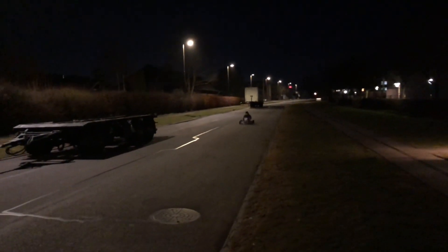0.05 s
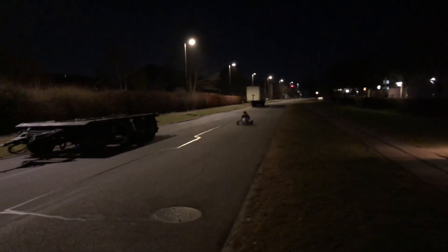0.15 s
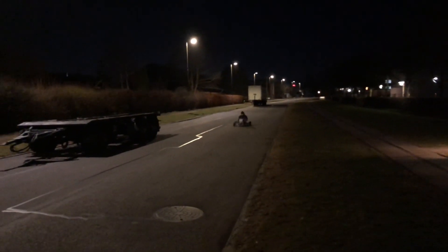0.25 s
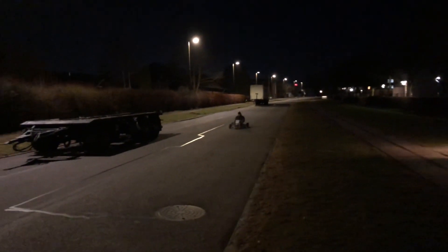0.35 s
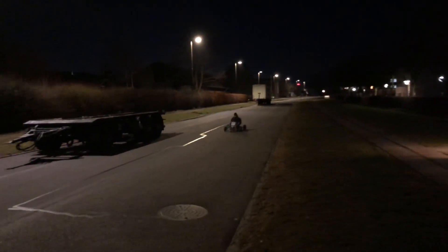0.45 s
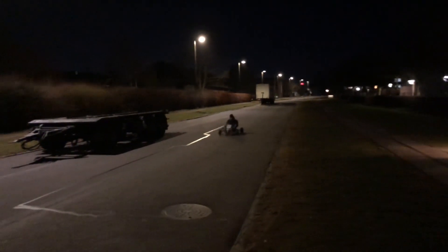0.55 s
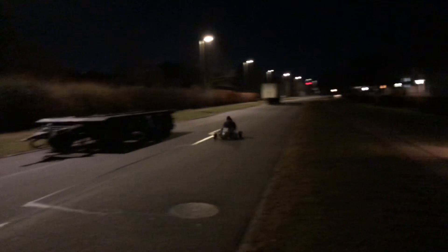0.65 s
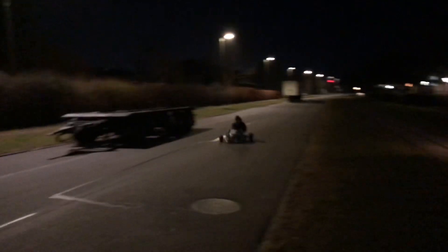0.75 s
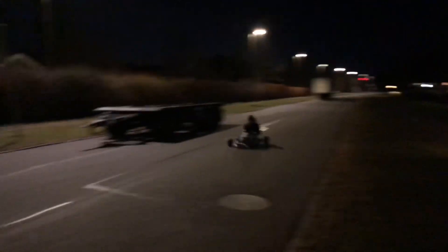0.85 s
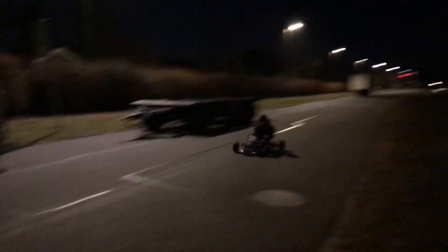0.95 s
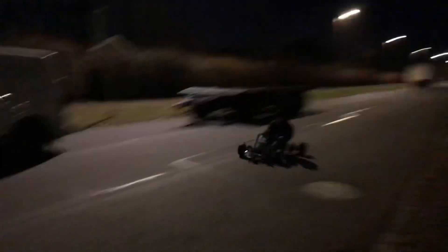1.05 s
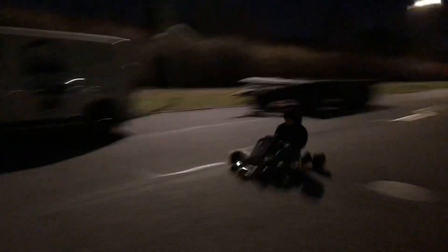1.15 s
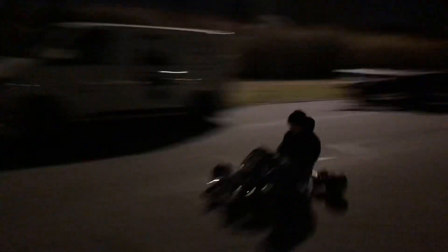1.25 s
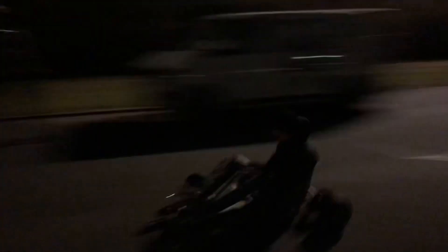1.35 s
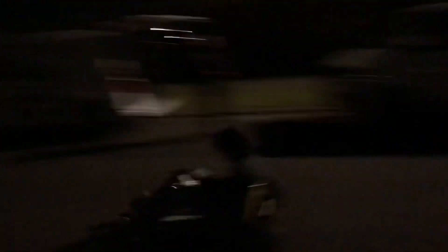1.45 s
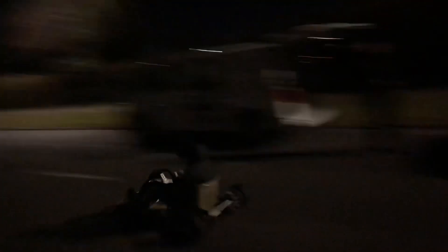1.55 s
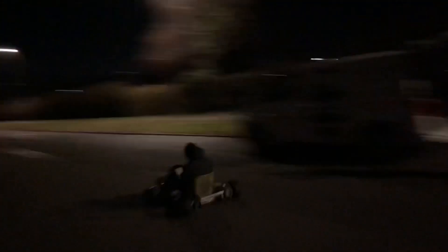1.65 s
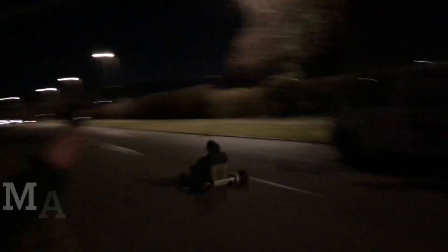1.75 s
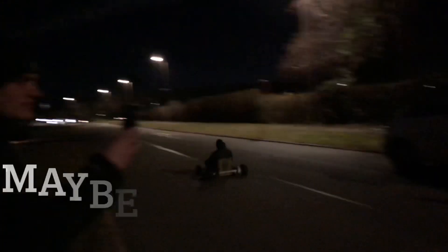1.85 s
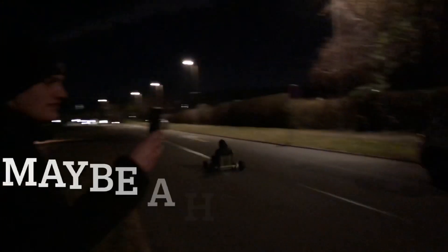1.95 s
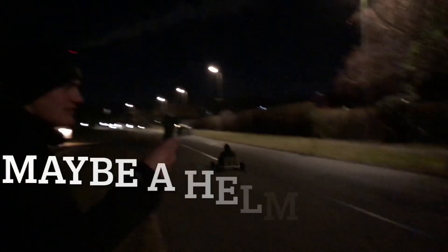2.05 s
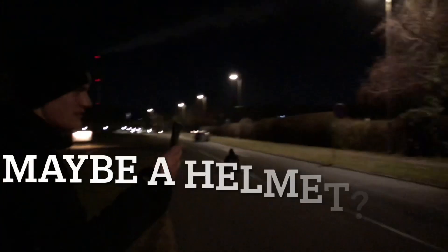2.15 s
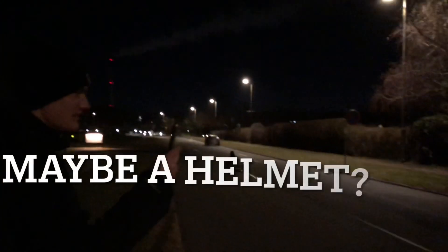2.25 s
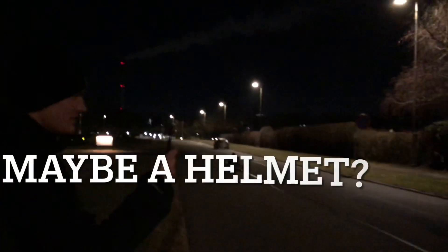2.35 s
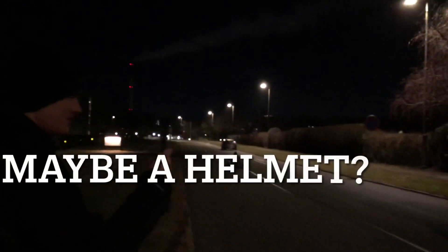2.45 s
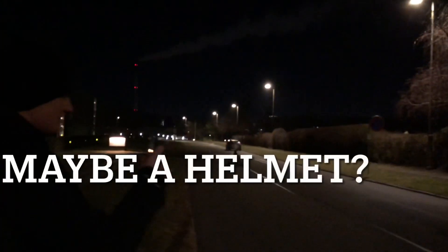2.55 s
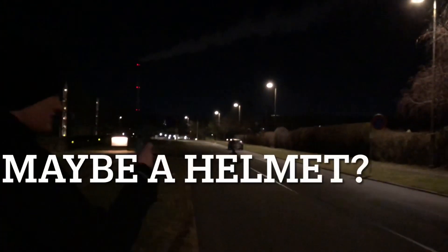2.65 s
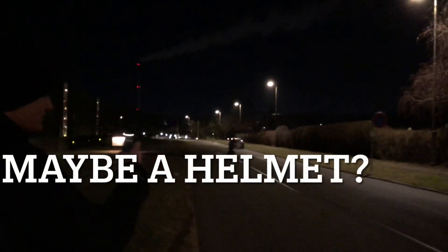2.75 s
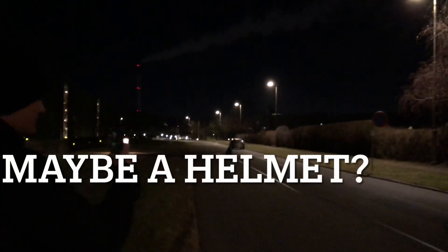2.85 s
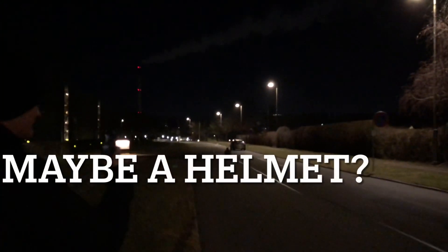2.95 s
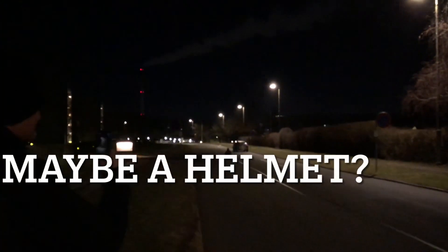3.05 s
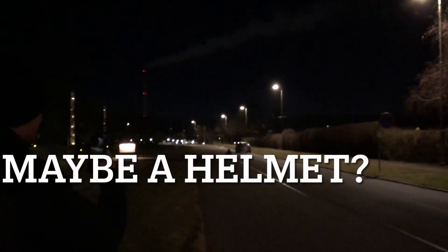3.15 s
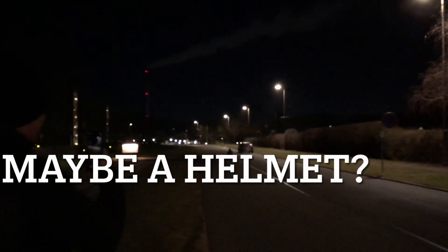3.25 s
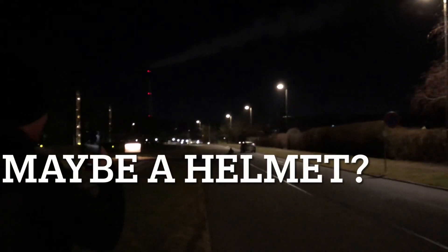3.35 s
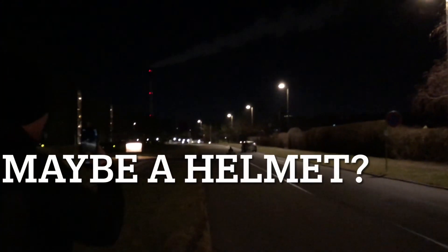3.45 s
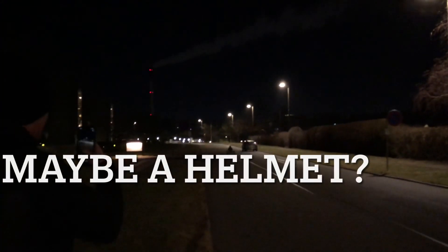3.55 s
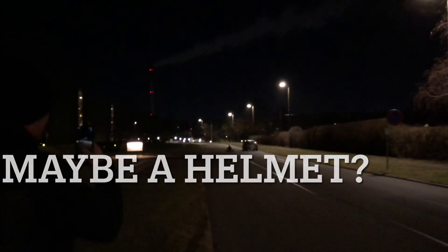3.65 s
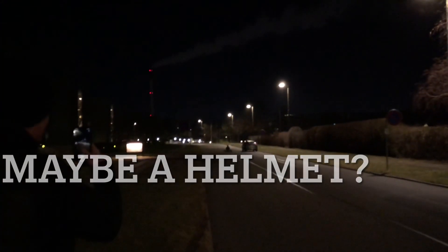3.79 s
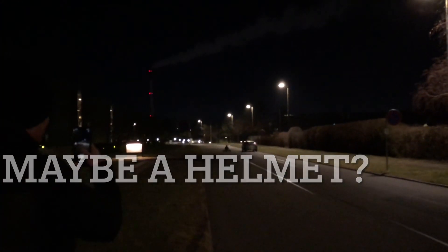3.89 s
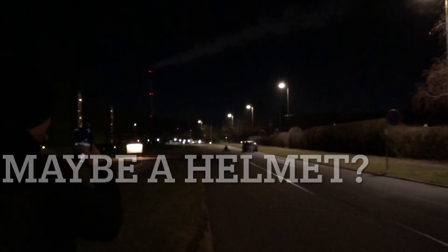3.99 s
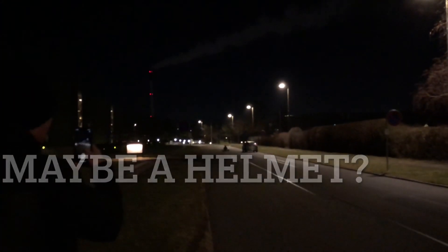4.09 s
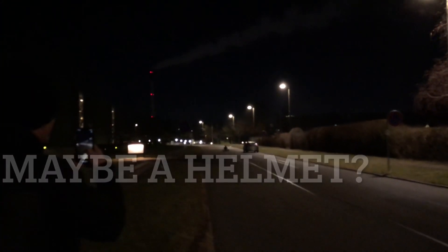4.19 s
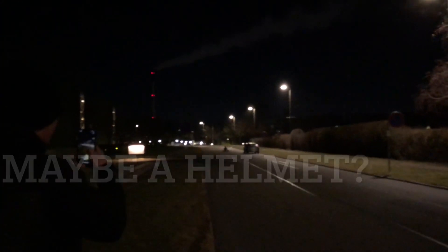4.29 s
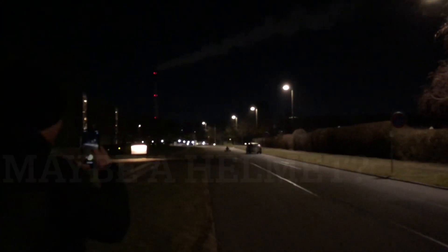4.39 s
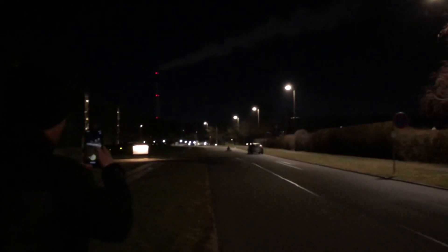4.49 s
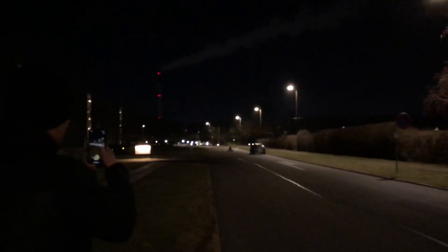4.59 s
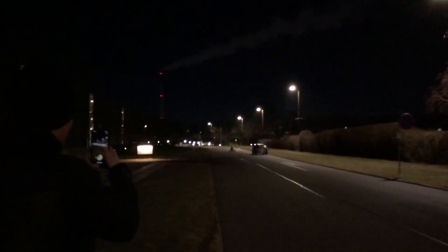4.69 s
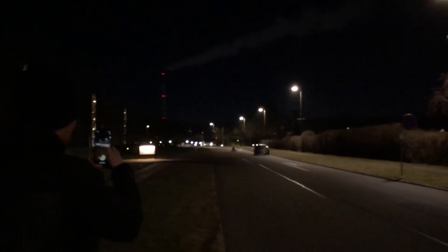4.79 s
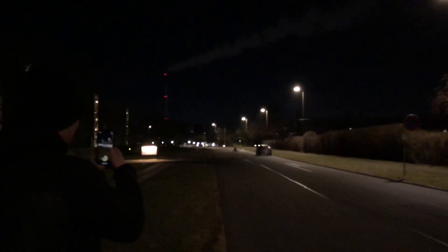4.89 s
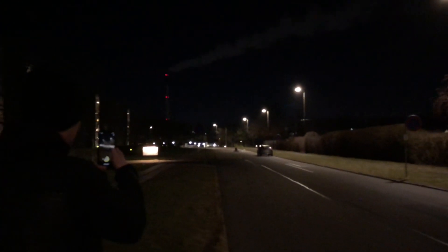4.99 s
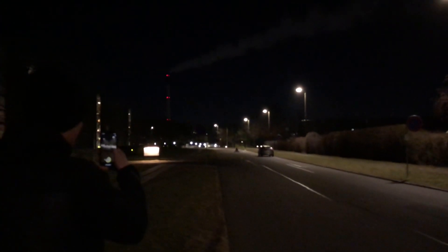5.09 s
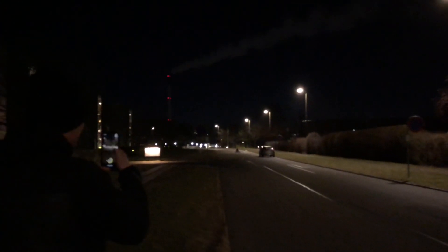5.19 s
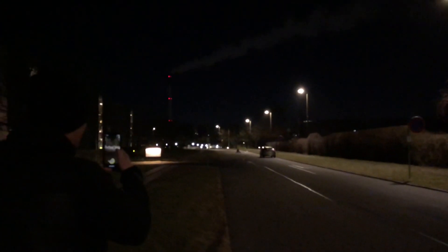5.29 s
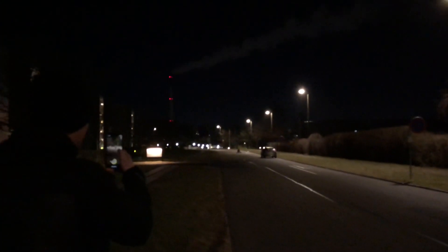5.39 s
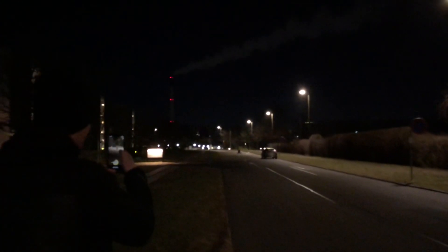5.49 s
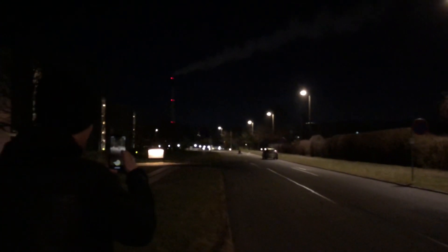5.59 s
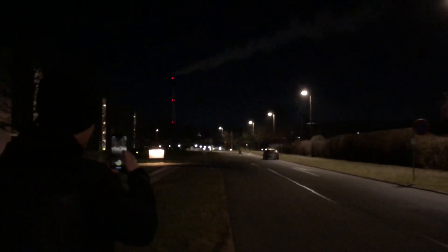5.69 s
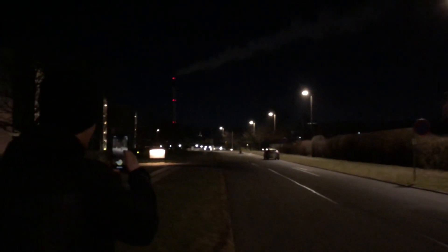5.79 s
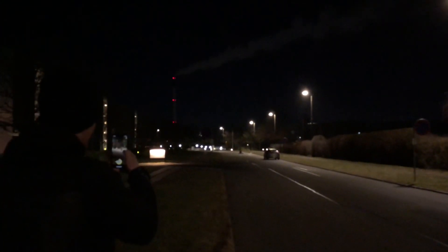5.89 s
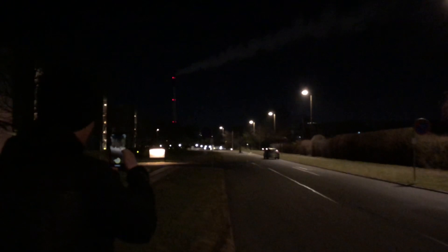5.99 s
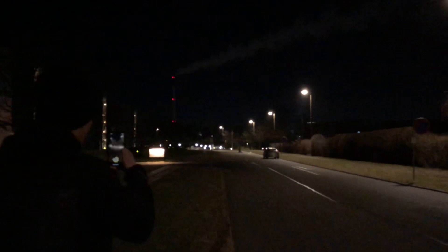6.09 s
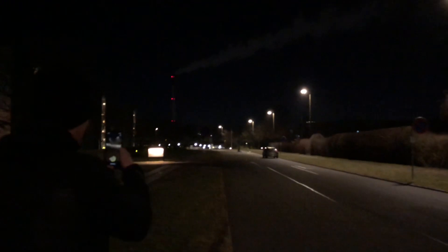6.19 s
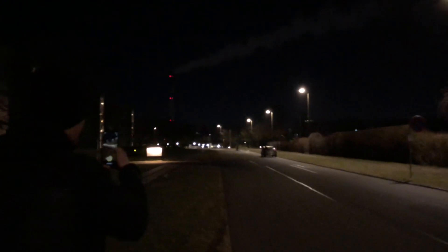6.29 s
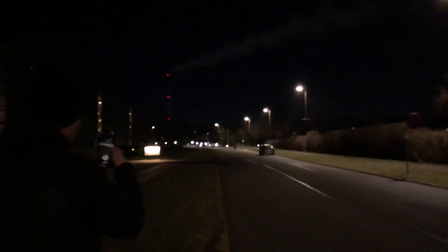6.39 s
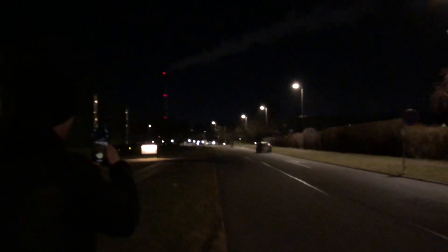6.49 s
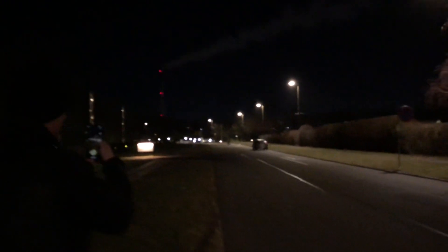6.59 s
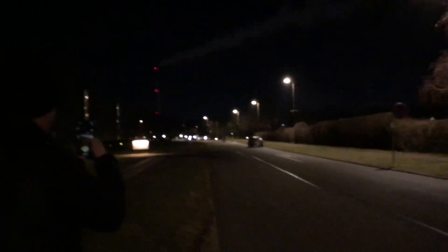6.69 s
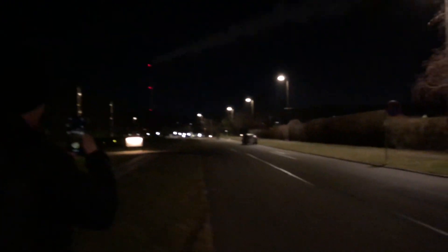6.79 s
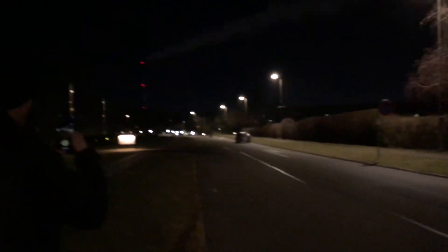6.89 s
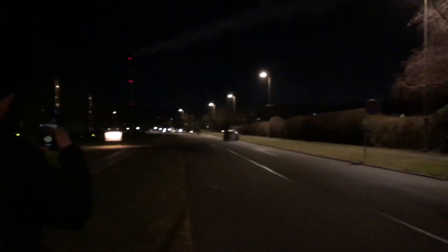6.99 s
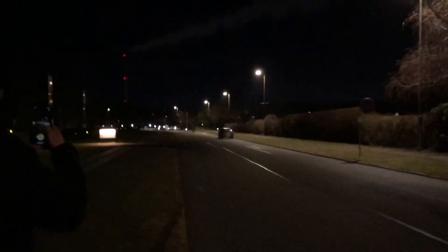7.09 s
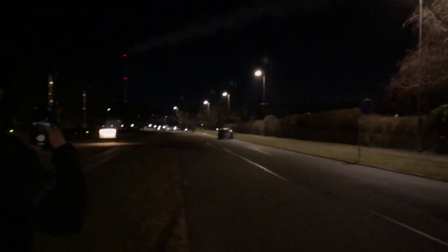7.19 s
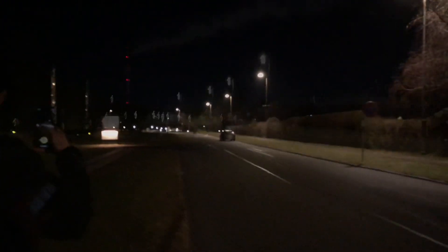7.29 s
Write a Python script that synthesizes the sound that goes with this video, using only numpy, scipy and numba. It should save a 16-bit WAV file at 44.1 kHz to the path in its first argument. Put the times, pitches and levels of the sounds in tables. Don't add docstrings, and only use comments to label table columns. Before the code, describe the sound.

A single electric kart passes once. The quick swell of tyre roar, chain rattle and piercing motor whine peaks about a second and a half in, then falls away fast. The fading whine climbs slightly under power, then slides downward as the kart brakes far off, with a faint late echo off parked trailers. Quiet far traffic remains on the open street. Mono phone microphone, slightly coloured treble, loud peak softly rounded.

```python
import sys
import numpy as np
from scipy import signal
from scipy.io import wavfile
from scipy.ndimage import uniform_filter1d
from numba import njit

SR = 44100
rng = np.random.default_rng(int(sys.argv[2]) if len(sys.argv) > 2 else 0)


def master(y):
    cut = np.clip(np.atleast_2d(y).T, -1, 1)
    pcm = np.round(cut * 32767)
    wavfile.write(sys.argv[1], SR, pcm.astype(np.int16))


def nominal_scale(level):
    x = np.asarray(level, float) / 20
    return 10 ** x


N = 323694
STEP = 64
SLOW_S = np.arange(N // STEP + 2) * STEP / SR
CLOCK_S = np.arange(N) / SR


def curves(table):
    seconds, *columns = np.transpose(table)
    return [np.interp(SLOW_S, seconds, column) for column in columns]


def fine(control):
    return np.interp(CLOCK_S, SLOW_S, control)


def humps(rows, gain):
    return sum(gain(db) * np.exp(-((SLOW_S - middle) / half) ** 2) for middle, half, db in rows)


def by_pitch(table, hz):
    table_hz, table_db = np.transpose(table)
    return np.interp(np.log(hz), np.log(table_hz), table_db)


def walk(rate):
    hold = int(SR / STEP / rate)
    levels = np.repeat(rng.standard_normal(len(SLOW_S) // hold + 1), hold)
    return 1.175 * uniform_filter1d(uniform_filter1d(levels, hold), hold)[:len(SLOW_S)]


def unit(x):
    return x / np.sqrt(np.mean(x ** 2))


@njit
def svf(x, g, k):
    y, b, l = np.empty(len(x)), 0., 0.
    for i in range(len(x)):
        v = (b + g[i] * (x[i] - l)) / (1 + g[i] * (g[i] + k))
        b, l, y[i] = 2 * v - b, l + 2 * g[i] * v, k * v
    return y


def band(hz, sharp):
    g = np.tan(np.pi * hz / SR)
    g = fine(g) if np.ndim(g) else np.full(N, g)
    once = svf(rng.standard_normal(N), g, sharp)
    return unit(svf(once, g, sharp))


def air_db(hz, hiss_db, slope):
    octaves_above = np.maximum(np.log2(hz / 8200), 0)
    return slope * octaves_above * (hiss_db - hiss_db.max())


# pitch in Hz, level in dB per Hz.
TOWN = [(18, -39), (30, -11), (102, 5.5), (328, -12.5), (597, 2), (1140, -12.5), (3070, -27), (6360, -32.5),
        (15000, -52.5)]


def town():
    out, swelling = 0, walk(0.72)
    for hz in 50 * 2 ** np.arange(0, 7.6, .5):
        db = by_pitch(TOWN, hz) + 10 * np.log10(hz)
        out = out + fine(nominal_scale(db + .6 * swelling + .7 * walk(3.1))) * band(hz, 0.52)
    return unit(out) * nominal_scale(-49.0)


# start in seconds, peak in dB.
GRIT = [
    (6.6745, -32.5),
]


def grit():
    out, t = np.zeros(N), np.arange(400) / SR
    shape = (1 - np.exp(-t / .0004)) * np.exp(-t / 0.0013)
    for s, db in GRIT:
        i = int(s * SR)
        out[i:i + len(t)] += nominal_scale(db) * shape * band(4300.0, 0.59)[i:i + len(t)]
    return out


def parked_trailers(whine, hiss_db):
    lag = int(.085 * SR)
    back = np.concatenate([np.zeros(lag), whine[:-lag]])
    return back * fine(nominal_scale(-8.0 + 0.6 * (hiss_db - hiss_db.max())))


# time in seconds, speed in turns per second.
MOTOR = [(0, 230.5), (1.1, 244), (2.05, 253.4), (2.45, 257.2), (3.35, 263.8), (3.52, 265.6), (3.65, 261.1),
         (3.95, 255.9), (4.15, 249.4), (4.65, 228.4), (5.15, 207.3), (5.65, 188.9), (6.15, 170.2),
         (6.7, 152.7), (7.34, 133)]
GEARING = 9.5
WHEEL_M, KERB_M = .86, 4.75
PASSES_S, SOUND_M_S = 1.44, 343


def track():
    turns = curves(MOTOR)[0]
    speed = turns * WHEEL_M / GEARING
    along = np.cumsum(speed) * STEP / SR
    along = along - np.interp(PASSES_S, SLOW_S, along)
    leaving = speed * along / np.hypot(along, KERB_M)
    return turns, along, turns / (1 + leaving / SOUND_M_S)


# loudest level in dB, best heard in metres past the phone,
# reach in metres, loss in dB per doubled distance, gain from behind in dB.
RUSH_LAW = [
    (-30, -3, 2.5, 5, 2),
    (-24.5, -2, 6, 5.5, 0.9),
    (-19, -4, 4.67, 5.5, 0.43),
    (-20.5, 1.5, 5.08, 5.5, 3.5),
]
# loss in the air in dB per 100 m, then growth as a power of speed.
AIR_DB_PER_100M = [0.5, 1, 4.2, 18]
SPEED_POWER = [0.48, 1.06, 1.3, 1.97]
# middle in seconds, half length in seconds, level in dB.
RISES_AND_DIPS = [
    (0, 0.27, -3),
    (0.548, 0.086, 0.5),
    (1.717, 0.077, 1.5),
    (2.338, .1, 1.6),
    (3.868, 0.2, -2.5),
    (4.6, 0.19, 1),
    (5.8, 0.43, -0.5),
]


def rush(turns, along):
    far = np.hypot(along, KERB_M)
    speed_db = 20 * np.log10(turns / turns.max())
    levels = []
    for (db, best, reach, fall, rear), air, power in zip(RUSH_LAW, AIR_DB_PER_100M, SPEED_POWER):
        spread_db = fall * np.log2(np.hypot((along - best) / reach, 1))
        levels.append(db - spread_db + rear * along / far - air * far / 100 + power * speed_db)
    sway_db = humps(RISES_AND_DIPS, float)
    return np.array(levels) + np.outer([0, 0, 0.49, 1], sway_db)


RUSH_CENTRE_HZ = [140, 650, 3100, 8200]
# pitch in Hz, level in dB in a third of an octave.
TYRE = [(30, -44), (60, -14), (140, -9), (320, -9.5), (500, -7), (850, -10), (1400, -6), (2200, -2),
        (3100, 1.5), (4500, 1.5), (6500, 0), (8200, -1), (11000, -2.5), (15500, -20)]


def tyres(rush_db):
    out, gust, patter = 0, walk(8), walk(13)
    for hz in 32 * 2 ** np.arange(0, 9, 1 / 3):
        share = [np.interp(np.log(hz), np.log(RUSH_CENTRE_HZ), row) for row in np.eye(4)]
        db = np.dot(share, rush_db) + by_pitch(TYRE, hz) + air_db(hz, rush_db[3], 0.96)
        db = db + 0.26 * gust + min(hz / 5000, 1) * 0.99 * patter + 1.0 * walk(12)
        out = out + fine(nominal_scale(db)) * band(hz, 0.39)
    return out


# pitch in Hz, width in
# Hz, level in dB.
FRAME = [(423, 67, -1), (592.6, 32, -3.5), (699.6, 20, -7.5), (961, 76, -6), (1746, 190, 0),
         (2225, 120, -0.5), (3080, 500, -3.5), (6700, 810, 2.5), (8200, 600, -3.5)]
# time in seconds, level in dB.
COAST = [
    (0, -27),
    (3.4, -4.5),
    (3.8, 0),
    (5.3, 1.5),
    (5.7, -1),
    (7.34, -1),
]


def frame(rush_db):
    out, coast_db = 0, curves(COAST)[0] - 2.5
    for hz, w, db in FRAME:
        drive_db = rush_db[1 + (hz > 1000) + (hz > 5000)]
        out = out + fine(nominal_scale(db + coast_db + drive_db + 1.4 * walk(7))) * band(hz, 1.5 * w / hz)
    return out


# time in seconds, level in dB.
LOAD = [
    (0, -2),
    (1.0, 0.5),
    (2.0, -3.5),
    (2.6, 0.5),
    (3.1, -1.5),
    (3.4, -1),
    (3.57, 1.5),
    (3.62, -17.5),
    (7.34, -8),
]
# multiple of the shaft, width in multiples, level in dB over the hiss.
RATTLE = [(10.47, 2.4, -8), (15, 1.2, -7.5), (19.56, 1.8, 1), (29.6, 2.6, -1), (39.6, 5.0, -5),
          (50.5, 18.0, -4.5)]


def chain(shaft_hz, hiss_db, behind):
    slap_db = hiss_db + np.minimum(curves(LOAD)[0], 0) + 3.2 * walk(14) - 1.1 * (1 - behind)
    out = 0
    for k, w, db in RATTLE:
        hz = k * shaft_hz
        level_db = db + slap_db + air_db(hz, hiss_db, 0.76) + walk(30)
        out = out + fine(nominal_scale(level_db)) * band(hz, w / k)
    return out


# middle in seconds, half length in seconds, height in dB.
SWELLING = [10, 9, 7, 8, 20, 19, 15, 14, 11]
SWELLS = [
    [(.05, 0.13, 17.5), (.87, 0.37, 17), (1.5, .2, 19.5), (2.1, 0.28, 5), (2.6, 0.43, 23),
     (3.4, 0.47, 19.5), (4.22, 0.11, 16.5), (4.62, 0.21, 22), (5.2, 0.12, 19.5), (5.7, 0.28, 24)],
    [(1.45, 0.34, 16.5), (2.75, 0.49, 24), (3.65, 0.19, 20)],
    [(1.35, 0.41, 20.5), (2.7, .55, 26.5)],
    [(.2, .3, 10), (1.3, .2, 3), (1.95, 0.21, 18.5), (4.5, .35, 15.5), (5.4, 0.33, 15)],
    [(1.5, 0.51, 8), (2.45, .3, 10.5), (3.15, .1, 8)],
    [(1.65, 0.1, -1), (2.5, 0.46, 11)],
    [(1.5, 0.1, 7), (2.0, 0.18, 11)],
    [(3.25, .3, 8.5)],
    [(1.45, .2, 9.5), (3.5, 0.13, 11.5)],
]


def swell(k):
    return 1 + humps(dict(zip(SWELLING, SWELLS)).get(k, []), nominal_scale)


# multiple of the shaft, place in WHINE_DB.
LINES_OF = [(10, 0), (9, 1), (7, 1), (8, 2), (20, 3), (19, 3), (15, 3), (25, 3), (29, 3), (30, 3), (40, 3)]
# dB from the front, dB from behind.
LINES_DB = [(-6, 2), (-5.5, 4), (-8, -4.5), (-1, -0.5), (-2, 3), (-5.5, 2), (-4.5, 4.5), (-16.5, -0.5),
            (-5.5, -14), (-18, -13.5), (-18, -18)]
LOADED = [(1, 1), (2, 1), (5, 1), (11, 2), (14, 2)]
# dB from the front, dB from behind.
LOADED_DB = [(-14, -10), (-9, -11.5), (-22, -12), (-15, -9.5), (-11, -9)]
WHINE_DB = (-14.5, -22, -20, -10)
# time in seconds, depth from 0 to 1.
THROB = [
    (0, 0),
    (2.0, 0),
    (4.35, 0.3),
    (4.5, 0.5),
    (4.7, 0.5),
    (4.9, 0.26),
    (7.34, 0.1),
]


def motor(shaft_hz, rush_db, behind):
    turn = 2 * np.pi * np.cumsum(fine(shaft_hz)) / SR
    throb = 1 + fine(np.clip(curves(THROB)[0], 0, 1)) * np.cos(turn / GEARING + 3.25)
    load_db, coast_db = curves(LOAD)[0], curves(COAST)[0]
    whine_db = [rush_db[2] + db for db in WHINE_DB]
    whine_db[3] = whine_db[3] + load_db
    driven = [(k, whine_db[column]) for k, column in LINES_OF]
    driven += [(k, rush_db[column] + load_db) for k, column in LOADED]
    lines = []
    for (k, db), (front, rear) in zip(driven, [*LINES_DB, *LOADED_DB]):
        lines.append((k, swell(k) * nominal_scale(db + front + (rear - front) * behind)))
    for k in (2, 11, 12):
        ring = sum(nominal_scale(db) / (1 + (2 * (k * shaft_hz - hz) / w) ** 2) for hz, w, db in FRAME)
        lines.append((k, ring * nominal_scale(rush_db[1 if k < 4 else 2] + coast_db + 1.0)))
    near = nominal_scale(.5 * (rush_db[3] - rush_db[3].max()))
    out = 0
    for k, gain in lines:
        flutter_db = 0.52 * walk(12) + (1.2 + 3.4 * near) * walk(40)
        wander = (0.62 + 0.066 * k) * walk(30)
        out = out + fine(gain * nominal_scale(flutter_db)) * np.sqrt(2) * np.sin(k * turn + fine(wander))
    return out * throb


def scene():
    turns, along, shaft_hz = track()
    rush_db = rush(turns, along)
    behind = .5 + .5 * along / np.hypot(along, 7.0)
    whine = motor(shaft_hz, rush_db, behind)
    kart = tyres(rush_db) + frame(rush_db) + chain(shaft_hz, rush_db[3], behind) + whine
    street = town() + grit() + parked_trailers(whine, rush_db[3])
    return np.tile(street + kart, (2, 1))


def band_limit(x):
    return signal.sosfilt(signal.butter(12, 15690, fs=SR, output="sos"), x)


# pitch in Hz, width in Hz, added share.
PORT = [(5530, 350, -0.14), (6050, 430, 0.58), (10600, 1300, -0.44), (11700, 390, 0.41)]


def record(dry):
    heard = dry[0]
    for hz, w, share in PORT:
        heard = heard + share * svf(heard, np.full(N, np.tan(np.pi * hz / SR)), w / hz)
    rounded = np.tanh(.75 * heard) / .8
    return band_limit(np.tile(rounded, (2, 1)))


dry = scene()
out = record(dry)
master(out)
```